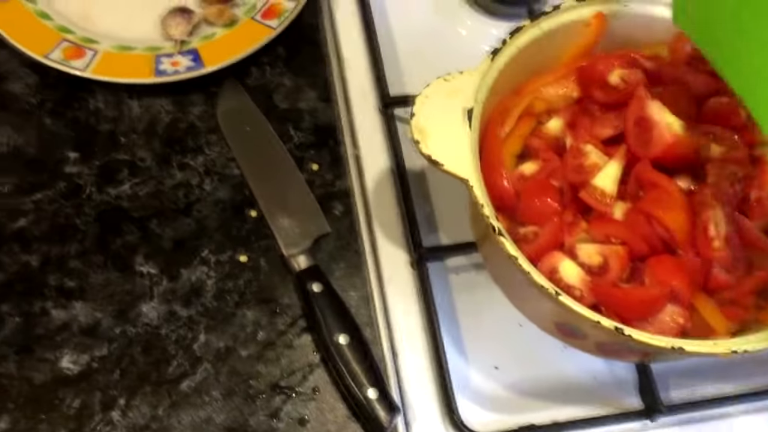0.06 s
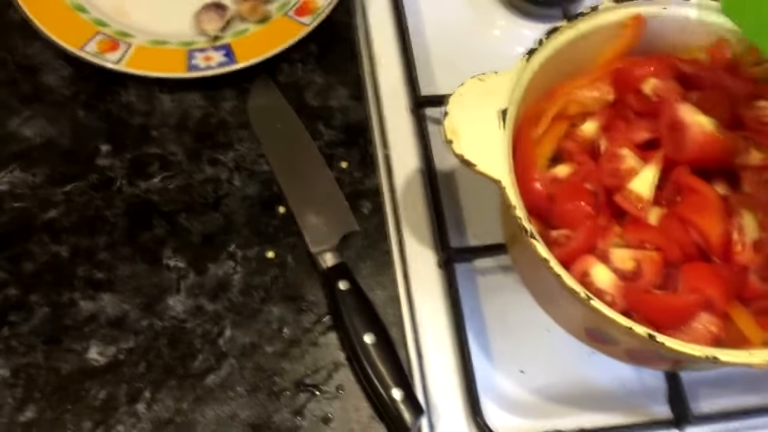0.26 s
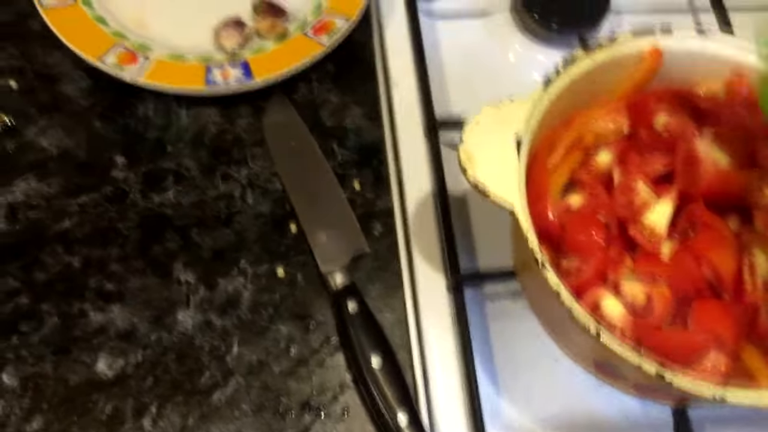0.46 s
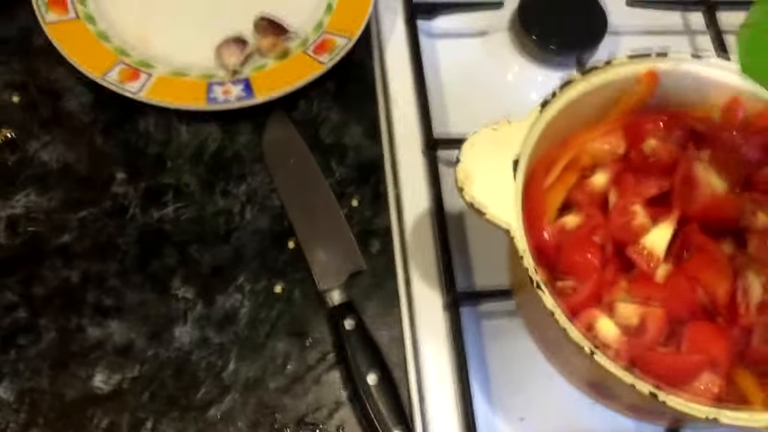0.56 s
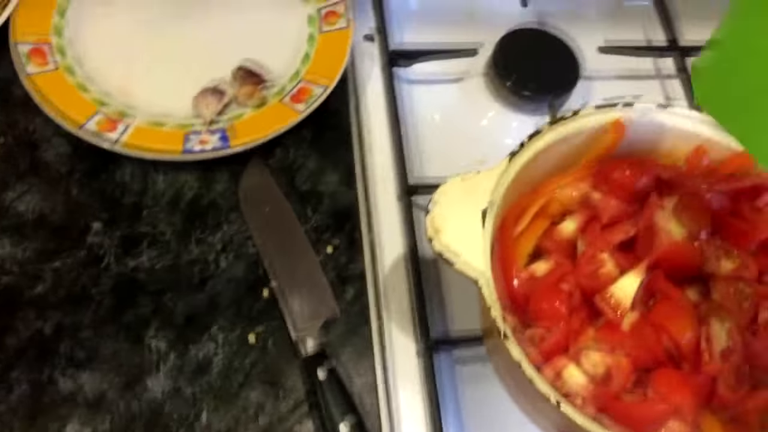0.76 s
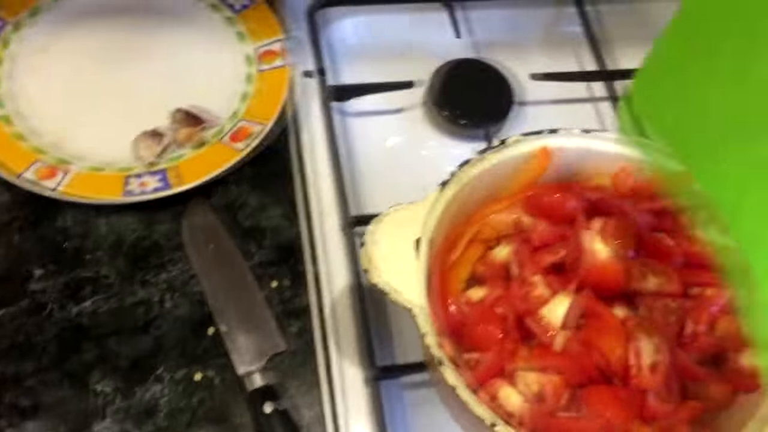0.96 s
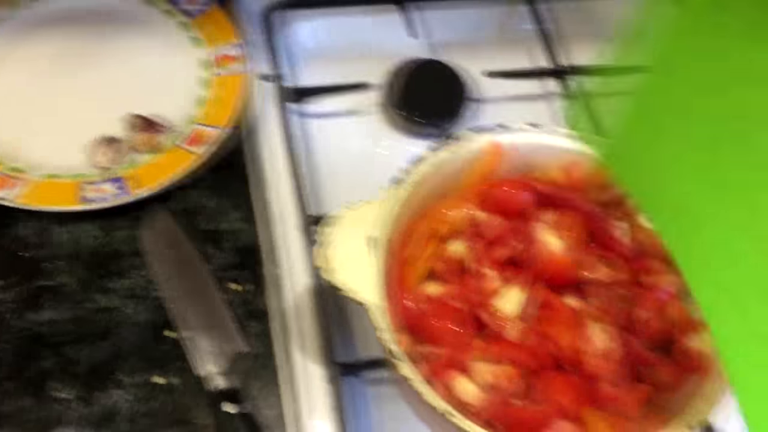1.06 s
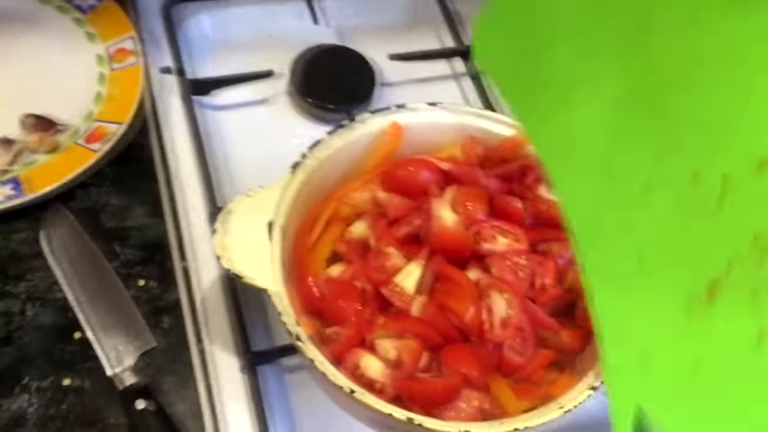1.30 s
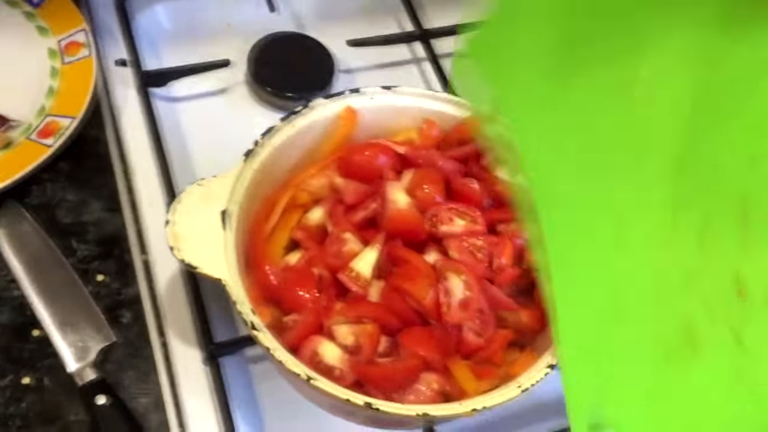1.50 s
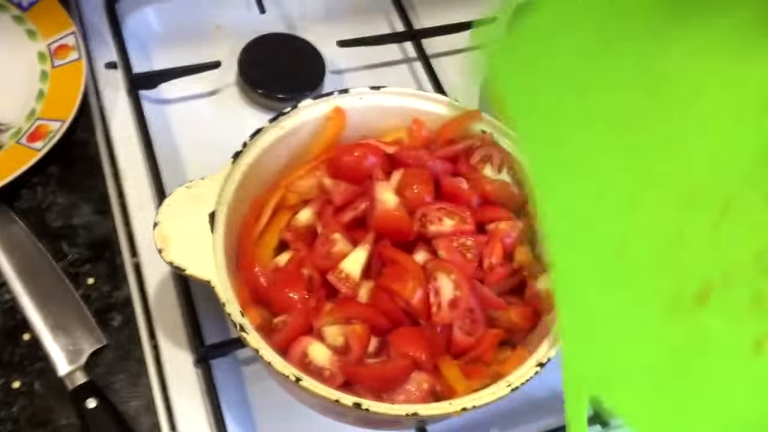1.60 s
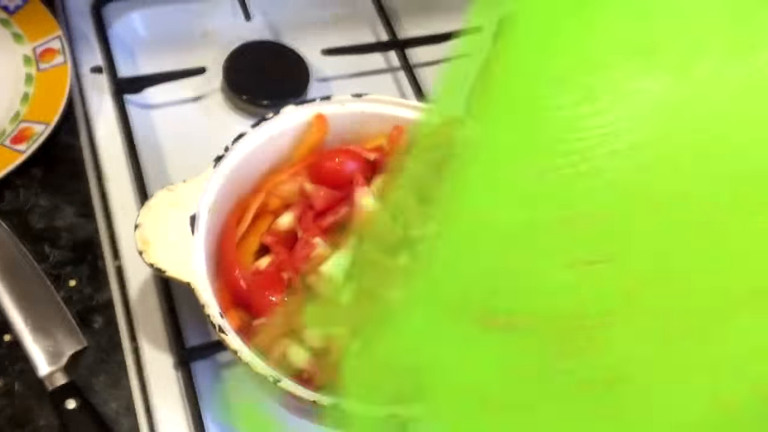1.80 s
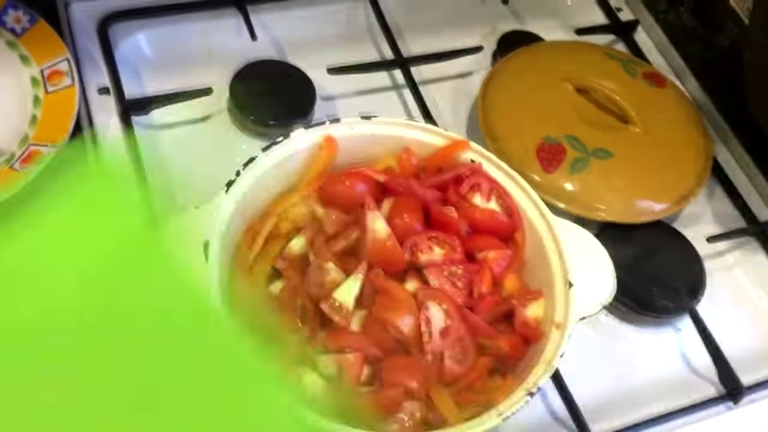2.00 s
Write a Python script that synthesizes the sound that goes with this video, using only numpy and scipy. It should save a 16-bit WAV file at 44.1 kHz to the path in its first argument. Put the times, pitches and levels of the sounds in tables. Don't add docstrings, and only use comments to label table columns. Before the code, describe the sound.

A thin plastic cutting board knocks on an enamelled pot rim. Vegetables simmer steadily with fine bubbling, hiss and occasional fat spits. Light touches and edge flaps come at 0.1-0.4 s, then eight hollow, drummy knocks from 0.51 to 1.73 s, about every 0.17 s, varying from dull to crisp, with small rattles and faint pot ring. Sizzle continues to 2 s. Close, short kitchen echo.

```python
import sys
import numpy as np
from scipy import signal
from scipy.fft import rfft, irfft, next_fast_len
from scipy.io import wavfile

SR = 44100
rng = np.random.default_rng(int(sys.argv[2]) if len(sys.argv) > 2 else 0)


def ratio_of_db(decibels):
    return 10 ** (np.asarray(decibels, float) / 20)


def transcribe(u):
    v = np.clip(np.atleast_2d(u).T, -1, 1)
    q = np.round(v * 32767).astype(np.int16)
    wavfile.write(sys.argv[1], SR, q)


N = 90404

# t/s, level/dB
SIMMER_VIGOUR = [
    (0.0, -36.5),
    (0.57, -36),
    (1.03, -37.5),
    (1.67, -35),
    (1.9, -37.5),
    (2.05, -39),
]
# f/Hz, level/dB
SIMMER_COLOUR = [(620, -22.5), (800, 0.9), (1240, -2), (1800, -5), (2560, -8), (3600, -17.5), (4900, -22.5),
                 (6400, -24)]
BUBBLES_PER_S, BUBBLE_CYCLES, BUBBLE_SIZE_SPREAD = 2300, 17, 1
BUBBLE_DB, HISS_DB = -4, -4.5

# t/s, level/dB
STEAM_LEVEL = [
    (0.0, -69),
    (0.13, -66.5),
    (0.35, -61.5),
    (0.88, -62),
    (1.39, -65),
    (1.6, -62),
    (1.9, -65.5),
    (2.05, -67.5),
]
# f/Hz, level/dB
STEAM_COLOUR = [(6800, -11), (8200, -3.5), (10300, -4), (12000, -1.5), (14000, -9), (15900, 2)]
# f/Hz, level/dB
RUMBLE_COLOUR = [(45, 20.5), (70, -9.5), (110, 5), (170, -20.5), (300, -9), (450, -6.5), (600, -28)]
STEAM_DB, RUMBLE_DB = -2, -51.5

# t/s, then level/dB of drum, body, snap and crack
KNOCKS = [
    (0.5121, -22, -19.5, -41, -27),
    (0.6741, -19, -12, -6.5, -19),
    (0.8594, -18, -13.5, -16.5, -13.5),
    (1.0416, -19.5, -17, -17.5, -11.5),
    (1.2082, -18.5, -10, -52, -10.5),
    (1.3821, -23.5, -19.5, -32, -28.5),
    (1.5469, -26, -17, -27, -16.5),
    (1.7274, -18, -23, -23.5, -12),
]
# board pitch factor, low pot level/dB, high pot level/dB, contact t/s, chatter level/dB
LANDINGS = [
    (1.02, -56, -60, 0.026, -35),
    (1.01, -64, -58, 0.022, -34),
    (1.02, -53, -74, 0.029, -33),
    (1.02, -50.5, -57, 0.026, -29.5),
    (1.068, -59, -58, 0.018, -33),
    (0.985, -58, -62, 0.041, -42),
    (1.024, -46, -58, 0.039, -33),
    (.97, -48, -52, 0.017, -29.5),
]
# lower middle tone level/dB, upper middle tone level/dB
LANDING_SPOTS = [
    (-16, -20),
    (-11.5, -22),
    (-13, -10),
    (-27, -24),
    (-10, -14),
    (-16.5, -13.5),
    (-20, -26),
    (-22.5, -16),
]
# t/s, drum level/dB, pitch factor
TOUCHES = [(0.083, -43, 0.75), (0.16, -56, 0.83), (0.237, -30.5, 0.97), (0.375, -40, 0.907),
           (0.384, -44, 0.563), (.575, -40, 1), (0.735, -32, 0.5), (0.743, -37, 1.0), (0.923, -40, 0.97),
           (1.104, -36, 0.97), (1.241, -32.5, 0.98), (1.424, -34, 1), (1.61, -40.5, 0.85),
           (1.79, -43.5, 0.88)]
# f/Hz, level/dB, time to fall 60 dB t/s
DRUM = [(101, -25, 0.18), (163, -25.5, 0.081), (199, -13.5, 0.098), (248, 2.5, 0.18), (281, -16.5, 0.15),
        (326, -3, 0.066), (372, 1, 0.04), (409.4, -12, 0.18), (479.6, -6, 0.13), (509.6, -4, 0.058),
        (580, -12, 0.091)]
BODY = [(623, -14, 0.078), (720, -2, 0.01), (820, -8.5, 0.026), (1042, -5, 0.031), (1205, 8, 0.011)]
SNAP = [(1395, -2, .018), (1515, -5, .013), (1620, -4, .015), (1740, -8, .011), (1880, -9, .011),
        (2065, -6, .014)]
CRACK = [(2250, -8, .010), (2410, -4, .014), (2560, -5, .011), (2700, -6, .011), (2830, -5, .010),
         (2960, -6, .010), (3130, -6, .010), (3280, -8, .009), (3400, -12, .008), (4200, -26, .008),
         (6500, -46, .006)]
EDGE_LOW = [(787, 0, 0.034)]
EDGE_HIGH = [(974, 0, 0.024)]
GRIP = [(112.4, -20.5, 0.12), (170.6, -22, 0.34), (237, -20, 0.22), (325.6, -24.5, 0.2)]
MODE_SCATTER_DB, MODE_DETUNE, PHASE_SCATTER_RAD = 1.5, .008, .3
TRAVEL_S, TRAVEL_POWER = 0.001204, .5
RISE_CYCLES = 0.34
TOUCH_CONTACT_S, TOUCH_BODY_DB = .024, -29
LIFT_S, AFTER_LIFT_DB = .002, -19

# t/s, peak level/dB
SPITS = [(0.1772, -37.5), (0.2805, -35), (0.4958, -32), (0.749, -32), (0.7874, -58), (0.847, -42),
         (1.4664, -47), (1.482, -33), (1.518, -33), (1.566, -29.5), (1.6054, -39), (1.7994, -35)]
SPIT_HZ, SPIT_T60_S = 5800, .008

# t/s, level/dB, length t/s, pitch f/Hz, upper tone level/dB
FLAPS = [(0.23, -36, 0.066, 1248, -10), (0.303, -35, 0.0089, 1170, -16), (0.3274, -20, 0.003, 1410, -31),
         (0.347, -19.5, 0.0023, 1600, -10), (0.38, -35, 0.023, 1110, -9), (0.492, -35.5, 0.015, 1304, 6),
         (0.524, -22, 0.0077, 1018, -4), (0.58, -31.5, 0.022, 1460, -13), (0.733, -22, 0.01, 1465, -7),
         (0.915, -31, 0.018, 1494, -24), (1.094, -32.5, 0.02, 1298, -7), (1.1885, -31, 0.0017, 1510, -10),
         (1.2624, -23, 0.011, 1400, -8.5), (1.402, -36, 0.016, 1510, 5.5), (1.46, -46, 0.0038, 1530, -19),
         (1.564, -31, 0.016, 1290, -4), (1.614, -27, 0.012, 1457, -1.5), (1.784, -20.5, 0.0083, 1470, -9.5),
         (1.793, -33.5, 0.023, 930, -25)]
FLAP_RATIO = 1.87
FLAP_RING, FLAP_BAND_HZ = 1.4, (750, 3400)

# f/Hz, level/dB, time to fall 60 dB t/s
POT_LOW = [(4180, -1, .09), (4673, -9, .06), (5230, -8, .07), (6045, -7, .08)]
POT_HIGH = [(6790, -8, .04), (7900, -9, .04), (8629, -1, .08), (11650, -11, .035), (12620, -9, .04),
            (13500, -10, .035)]
BUZZ_T60_S, BUZZ_BAND_HZ, BUZZ_TOP_DB = 0.2, (870, 2915), 0

KITCHEN_T60_S, KITCHEN_DB, WALL_CUT_HZ, KITCHEN_LOW_HZ = 0.3, -22, 2700, 248
LOW_CUT_HZ, TOP_CUT_HZ, OVERLOAD = 85, 16150, .62


def rms_one(x):
    return x / np.sqrt(np.mean(x ** 2) + 1e-20)


def at_hz(points, hz):
    table_hz, table_db = np.array(points).T
    return np.interp(np.log(hz), np.log(table_hz), table_db)


def over_time(points):
    return np.interp(np.arange(N) / SR, *np.transpose(points))


def drift(rate):
    r = np.exp(-80 * np.pi * rate / SR)
    noise = rng.standard_normal(N // 40 + 2002)
    slow = signal.lfilter([1], [1, -2 * r, r * r], noise)[2000:]
    return np.interp(np.arange(N) / 40, np.arange(len(slow)), rms_one(slow))


def ring(x, hz, t60):
    r = ratio_of_db(-60 / (t60 * SR))
    w = 2 * np.pi * hz / SR
    return signal.lfilter([0, np.sin(w)], [1, -2 * r * np.cos(w), r * r], x + 1e-18)


def add(out, s, sound):
    i = int(s * SR)
    out[i:i + len(sound)] += sound[:N - i]


def band_pass(order, band_hz):
    return signal.butter(order, band_hz, "band", fs=SR, output="sos")


def banded_noise(spectrum, patchy_db):
    out, together = 0, drift(19.0)
    white = rng.standard_normal((2, N))
    edges = np.geomspace(spectrum[0][0], min(spectrum[-1][0], .45 * SR), 12)
    for k, (low, high) in enumerate(zip(edges, edges[1:])):
        band = signal.sosfilt(band_pass(2, [low, high]), white[k % 2])
        flicker_db = patchy_db * (0.56 * together + drift(7.3))
        out = out + band * ratio_of_db(at_hz(spectrum, np.sqrt(low * high)) + flicker_db)
    return rms_one(out)


def simmer():
    sizes = ratio_of_db(BUBBLE_SIZE_SPREAD * np.minimum(rng.exponential(1, N), 5)) * rng.choice([-1, 1], N)
    born = rng.random(N) < BUBBLES_PER_S * ratio_of_db(1.2 * drift(8)) / SR
    pitches = np.geomspace(700, 6600, 30)
    dealt = rng.integers(0, 30, N)
    bubbles = 0
    for k, hz in enumerate(pitches):
        clicks = sizes * born * (dealt == k)
        bubbles = bubbles + ratio_of_db(at_hz(SIMMER_COLOUR, hz)) * hz * ring(clicks, hz, BUBBLE_CYCLES / hz)
    mix = ratio_of_db(BUBBLE_DB) * rms_one(bubbles) + ratio_of_db(HISS_DB) * banded_noise(SIMMER_COLOUR, patchy_db=2.0)
    return ratio_of_db(over_time(SIMMER_VIGOUR)) * signal.sosfilt(band_pass(8, [650, 7000]), mix)


def steam():
    return ratio_of_db(STEAM_DB + over_time(STEAM_LEVEL)) * banded_noise(STEAM_COLOUR, patchy_db=3.5)


def rumble():
    return ratio_of_db(RUMBLE_DB) * banded_noise(RUMBLE_COLOUR, patchy_db=1.0)


def lift(t, contact_s):
    left = 1 / (1 + np.exp(-np.clip((t - contact_s) / LIFT_S, -50, 50)))
    return ratio_of_db(AFTER_LIFT_DB * left)


def strike(modes, db, pitch, t, detune=MODE_DETUNE):
    hz, level_db, t60 = np.array(modes).T[:, :, None]
    luck = rng.standard_normal((len(modes), 3))
    hz = hz * pitch * (1 + detune * luck[:, :1])
    level_db = db + level_db + MODE_SCATTER_DB * luck[:, 1:2]
    delay = TRAVEL_S * (1000 / hz) ** TRAVEL_POWER
    since = np.maximum(t - delay, 0)
    shape = (1 - np.exp(-since * hz / RISE_CYCLES)) ** 2 * ratio_of_db(-60 * since / t60)
    phase = 2 * np.pi * hz * (t - delay / (1 - TRAVEL_POWER)) + PHASE_SCATTER_RAD * luck[:, 2:]
    return np.sum(ratio_of_db(level_db) * shape * np.sin(phase), axis=0)


def board():
    out, t = np.zeros(N), np.arange(SR // 3) / SR
    for knock, landing, (low_db, high_db) in zip(KNOCKS, LANDINGS, LANDING_SPOTS):
        s, drum_db, body_db, snap_db, crack_db = knock
        pitch, _, _, contact_s, _ = landing
        damped = strike(EDGE_LOW, low_db, 0.99, t) + strike(EDGE_HIGH, high_db, 0.94, t)
        damped += strike(DRUM, drum_db, pitch, t) + strike(BODY, body_db - 1.5, pitch, t)
        damped += strike(SNAP, snap_db + 1.5, 1, t) + strike(CRACK, crack_db - 3.0, 0.88, t)
        add(out, s, lift(t, contact_s) * damped + strike(GRIP, drum_db, pitch, t))
    for s, db, pitch in TOUCHES:
        touch = strike(DRUM, db - 2.0, pitch, t) + strike(BODY, db + TOUCH_BODY_DB, 0.864, t)
        soft_start = np.minimum(t / 0.002, 1)
        add(out, s, lift(t, TOUCH_CONTACT_S) ** 0.12 * soft_start * touch)
    return out


def spits():
    out, t = np.zeros(N), np.arange(SR // 50) / SR
    for s, db in SPITS:
        burst = np.diff(rng.standard_normal(len(t) + 1)) * ratio_of_db(-60 * t / SPIT_T60_S)
        tick = ring(burst, SPIT_HZ, .001)
        add(out, s, ratio_of_db(db - 7.0) * tick / abs(tick).max())
    return out


def flaps():
    out, t = np.zeros(N), np.arange(SR // 10) / SR
    band = band_pass(3, FLAP_BAND_HZ)
    for s, db, length, hz, upper_db in FLAPS:
        t60 = FLAP_RING * length
        swell = np.sin(np.pi * np.clip(t / length, 0, 1) ** 0.9) ** 2
        rattle = signal.sosfilt(band, rng.standard_normal((2, len(t))) * swell)
        low, high = [ring(ring(x, f, t60 / 2), f, t60) for x, f in zip(rattle, (hz, hz * FLAP_RATIO))]
        flap = low / abs(low).max() + ratio_of_db(upper_db) * high / abs(high).max()
        add(out, s - .0015, ratio_of_db(db) * flap)
    return out


def pot():
    out, t = np.zeros(N), np.arange(SR // 4) / SR
    band = band_pass(4, BUZZ_BAND_HZ)
    for (s, *_), (_, low_db, high_db, contact_s, chatter_db) in zip(KNOCKS, LANDINGS):
        buzz = rng.standard_normal((2, len(t))) * ratio_of_db(-60 * t / BUZZ_T60_S) * np.minimum(t / 0.0035, 1)
        chatter = signal.sosfilt(band, buzz[0] * lift(t, contact_s) ** 0.2)
        bright = np.diff(buzz[1], prepend=0)
        add(out, s, ratio_of_db(chatter_db + 13) * chatter + ratio_of_db(high_db + BUZZ_TOP_DB) * bright)
        add(out, s, strike(POT_LOW, low_db + 11.5, 0.95, t, detune=0))
        add(out, s, strike(POT_HIGH, high_db + 3, 0.97, t, detune=0))
    return out


def kitchen(x):
    size = next_fast_len(N + SR)
    w = 2 * np.pi * np.arange(size // 2 + 1) / size
    dull = 1 / (1 + 1j * w * SR / (2 * np.pi * WALL_CUT_HZ))
    echoes = 0
    for k, lag in enumerate(rng.uniform(.006, .03, 20)):
        once = ratio_of_db(-60 * lag / KITCHEN_T60_S) * dull * np.exp(-1j * w * lag * SR)
        echoes = echoes + (-1) ** k * once / (1 - once)
    less_bass = w / (w + 2 * np.pi * KITCHEN_LOW_HZ / SR)
    return irfft(rfft(x, size) * less_bass * echoes, size)[:N]


def scene():
    background = simmer() + steam() + rumble()
    knocks = board() + flaps() + pot()
    return (background + knocks + ratio_of_db(KITCHEN_DB) * kitchen(knocks) + spits())[None]


def band_limit(x):
    return signal.sosfilt(signal.butter(12, 16740, fs=SR, output="sos"), x)


def record(dry):
    x = signal.sosfilt(signal.butter(3, LOW_CUT_HZ, "high", fs=SR, output="sos"), dry)
    x = OVERLOAD * np.tanh(x / OVERLOAD)
    x = signal.sosfilt(signal.cheby2(14, 60, TOP_CUT_HZ, fs=SR, output="sos"), x)
    return band_limit(x)


dry = scene()
out = record(dry)
transcribe(out)
```